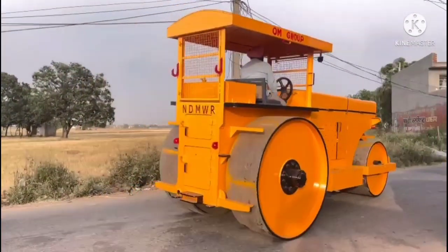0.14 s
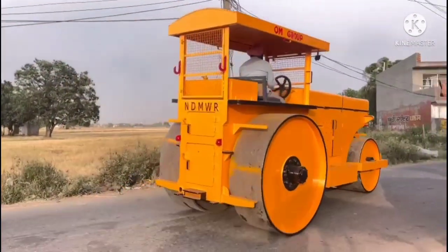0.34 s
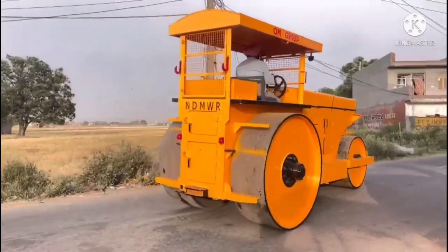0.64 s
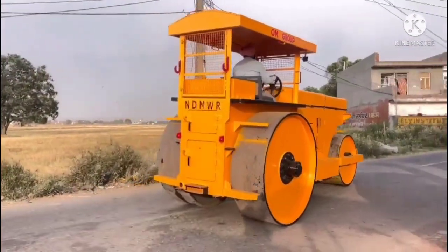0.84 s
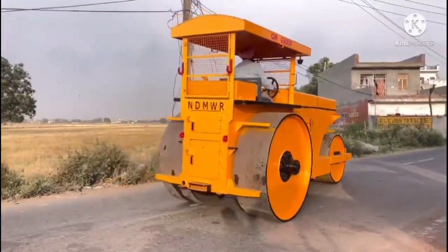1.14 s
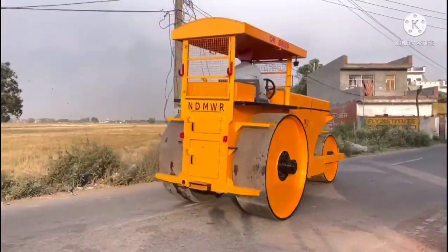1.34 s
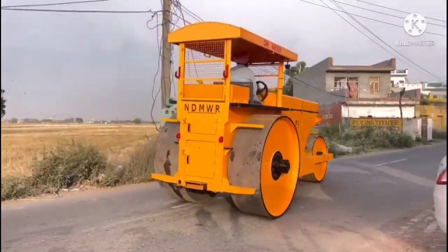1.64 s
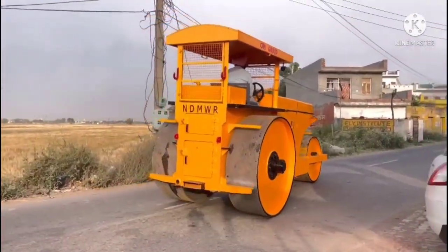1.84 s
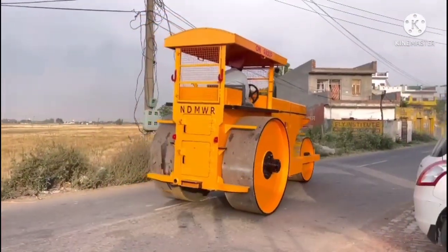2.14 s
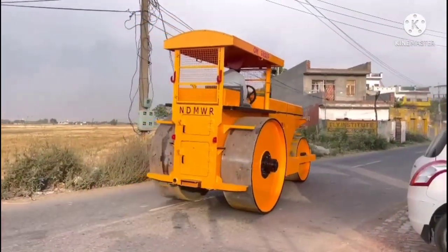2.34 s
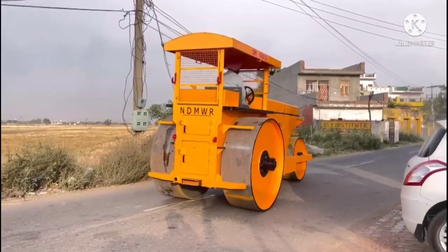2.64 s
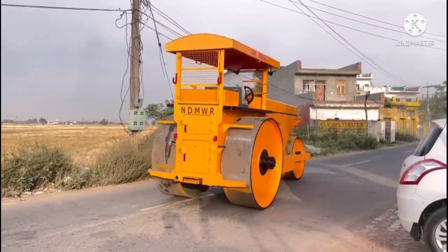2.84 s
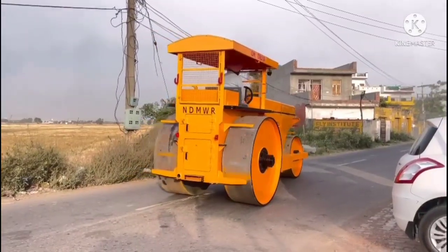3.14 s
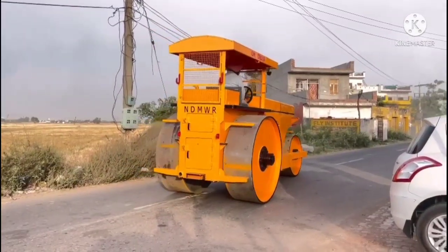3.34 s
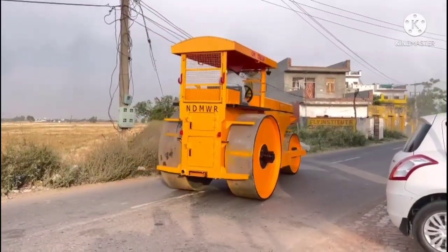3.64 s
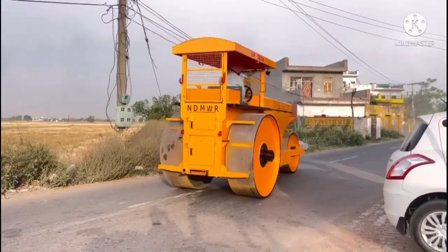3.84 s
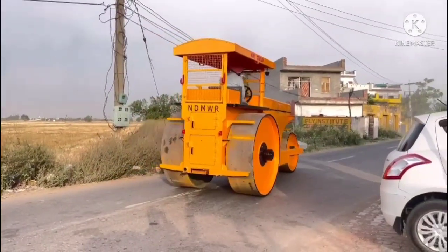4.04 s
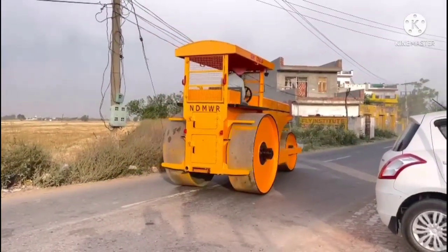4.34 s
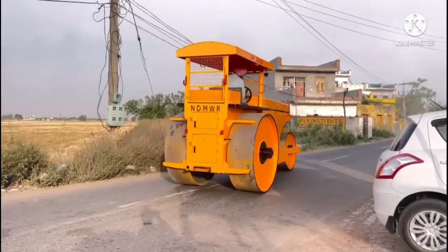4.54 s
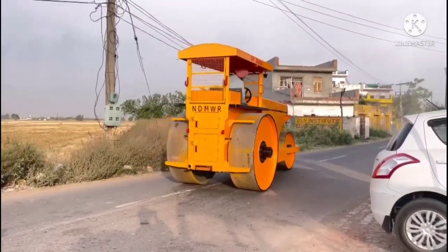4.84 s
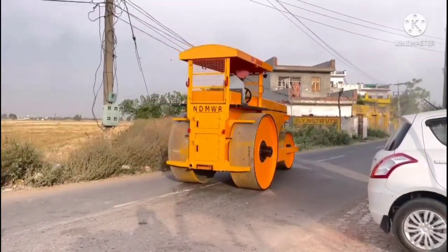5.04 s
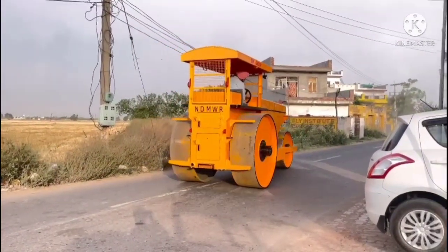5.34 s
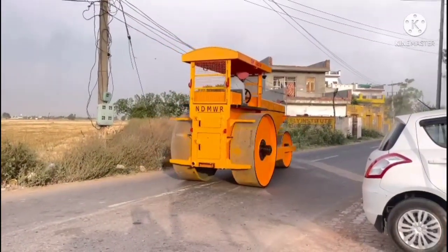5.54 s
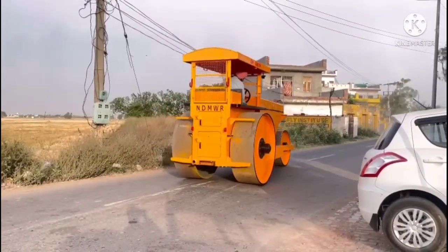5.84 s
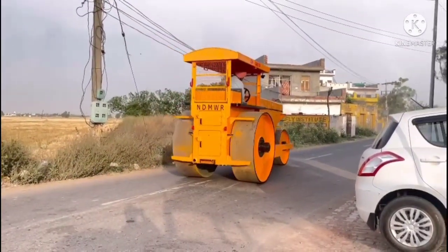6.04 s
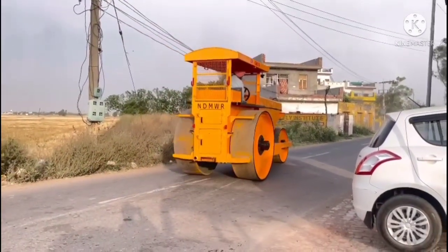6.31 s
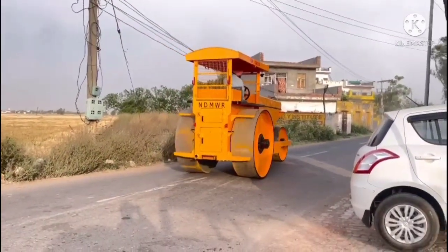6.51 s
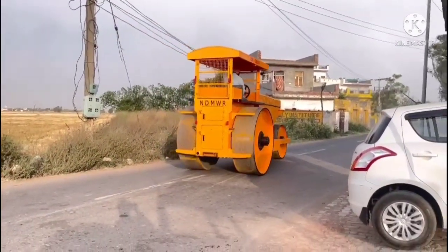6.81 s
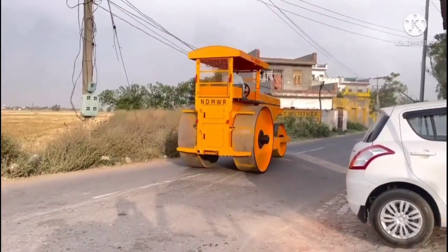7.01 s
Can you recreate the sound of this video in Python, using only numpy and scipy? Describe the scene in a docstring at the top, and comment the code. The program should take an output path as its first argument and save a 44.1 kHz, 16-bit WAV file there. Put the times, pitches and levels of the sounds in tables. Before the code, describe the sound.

Boomy wind flutters and thumps against a handheld microphone beside a road, partly covering a slow six-cylinder diesel roller. The engine runs evenly with metallic clatter, rattling covers, hiss and wavering whine, growing a little fainter as it moves off. Two faint dry rasps pass early. A calm lets the machine come through, a short burst of rough gusts follows, and the engine alone remains.

```python
"""A road roller drives slowly away: its six-cylinder diesel knocks, clatters, hisses, whines and hums throughout.
From the start wind rumbles and flutters over the engine, with surges, slaps and puffs of filtered noise.
Two dry rasps pass early on, at about 0.3 and 1.6 s. Near 4.5 s the wind drops.
A sharp gust returns at about 5.8 s, then the wind dies away and leaves the engine.
Noise through resonances makes the machine, sines its tones; overloaded noise and swings make the wind."""
import sys
import numpy as np
from scipy import signal
from scipy.fft import rfft, irfft
from scipy.io import wavfile
from scipy.ndimage import uniform_filter1d

SR = 44100
rng = np.random.default_rng(int(sys.argv[2]) if len(sys.argv) > 2 else 0)


def persist_wave(psi):
    """Save psi, clipped to +-1, as 16-bit WAV."""
    counts = np.round(np.clip(psi, -1, 1) * 32767).astype(np.int16)
    wavfile.write(sys.argv[1], SR, np.atleast_2d(counts).T)


N = 316197
TIME = np.arange(N) / SR
FREQS = np.fft.rfftfreq(N, 1 / SR)

# engine speed, hunting slightly under the governor: time_s, speed_rpm
ENGINE_SPEED = [(0, 993), (.5, 984), (.8, 996), (1.1, 1003), (1.45, 994), (1.75, 1001), (2, 1010),
                (2.6, 999), (3, 1007), (3.3, 1006), (3.55, 1012), (3.95, 1018), (4.25, 1009), (4.5, 1013),
                (4.8, 1008), (5.15, 1016), (5.55, 1006), (5.9, 1010), (6.45, 1012), (6.75, 1005),
                (7.17, 1010)]
# blows within one cycle of two revolutions: place_in_cycle (0-1), ring_hz, ring_width_hz,
# level_db (against the other blows), rattle_decay_s
KNOCKS = [(.33, 1013, 110, -16, 0.0032), (.46, 964, 89, -16, 0.0086), (.62, 1008, 86, -10, 0.0092),
          (.8, 1016, 68, -13, 0.003), (.09, 814, 98, -12.5, 0.0052), (0, 1410, 420, -11, 0.018),
          (.61, 2120, 970, -16, 0.005), (.19, 6200, 2200, -17.5, 0.018), (.25, 3840, 610, -21.5, 0.0074),
          (.26, 9800, 2800, -23, 0.025)]
# colour of the steady clatter of gears, fan and rolls: frequency_hz, relative_density_db
CLATTER_COLOUR = [(25, -15), (54, 10), (100, 4.5), (200, -3), (380, -3), (560, -4.5), (780, 1), (1040, -4),
                  (1095, -4), (1250, -4.5), (1550, -8), (1900, -13), (2400, -19), (5000, -52)]
# panels and castings that ring under the shaking: ring_hz, width_hz, lift_db
PANELS = [(260, 20, 7.5), (370, 12, 6), (402, 4.6, 5), (480, 37, 6), (655, 27, 5), (720, 28, 3.5),
          (847, 15, 4), (947, 46, 3.5), (1017, 46, 4), (1050, 27, 4), (1347, 63, 3.5), (1499, 24, 7),
          (1610, 57, 5), (2028, 54, 4.5), (2520, 190, 0), (3180, 120, 0.5), (4180, 180, 1.5)]
# level of the engine's body, which fades unevenly: time_s, level_db
BODY_LEVEL = [(0, -32.5), (.4, -33.5), (1.3, -35), (2.45, -36), (3.1, -35.5), (4, -35.5), (5.3, -36),
              (6.3, -36), (6.6, -37)]
# colour of the injector and fan hiss: frequency_hz, relative_density_db
HISS_COLOUR = [(1400, -24), (1900, 0.5), (2600, 3), (2900, 1.5), (3300, 1.5), (4300, -0.7), (4900, -2),
               (6300, -3), (7000, -8), (9400, -11), (11500, -14.5)]
# brief swells of the hiss: middle_s, lift_db, half_length_s
HISS_SWELLS = [(0.332, 2.5, .06), (2.12, 1.5, 0.074), (3.17, 1, 0.11)]
# loose covers that rattle: centre_hz, width_hz, level_db (at the starting distance)
COVERS = [(1660, 140, -47.5), (2567, 200, -46), (3470, 350, -51.5)]
# steady gear tones: multiple_of_cycle_rate (rounded when played), level_db (at the starting distance)
WHINE_TONES = [(98.2, -53), (96.5, -48), (115, -49.5), (117.7, -48.5), (120.4, -41.5), (122, -47),
               (122.2, -44.5), (125.7, -45.5), (162.7, -57), (180.1, -50), (194.5, -54)]
# gear tones that sing out for a while: middle_s, multiple_of_cycle_rate (rounded when played),
# level_db, half_length_s
WHINE_STRANDS = [(0.38, 123, -31.5, 0.3), (.17, 118, -35, .12), (.9, 117, -37, 0.24), (1.15, 127, -40, 0.4),
                 (2.2, 121, -43, .4), (2.6, 114, -42, .45), (2.9, 115, -40, 0.5), (2.9, 120, -42, .4),
                 (3.12, 117, -35.5, 0.34), (3.27, 123, -36, 0.28), (3.74, 118, -45, .3),
                 (4.4, 100, -38, 0.92), (3.9, 96, -39, .5), (5.15, 97, -37, .25), (5.53, 120, -34.5, 0.43),
                 (6.1, 126, -41, .4), (5.8, 123, -39, 0.32), (5, 178, -46, 1.2), (7.1, 114, -40, 0.33)]
# exhaust tones: multiple_of_cycle_rate, level_db (before wavering)
EXHAUST_TONES = [(6, -42), (7, -38), (12, -48), (18, -42.5), (24, -52), (30, -43.5)]
# how alike left and right are: frequency_hz, coherence (0-1)
STEREO_LIKENESS = [(60, 0.66), (500, 0.74), (1000, 0.77), (1400, 0.44), (2000, 0.16), (2700, 0.52),
                   (3750, 1), (4300, 1), (5100, 0.49), (6100, 0.93), (6900, 0.99), (7500, 1)]
# phase between left and right: frequency_hz, phase_turn_rad
STEREO_PHASE = [(6200, 0), (7400, 2.4), (7600, np.pi), (8900, np.pi), (10000, 5.1), (10600, 2 * np.pi)]
# level between left and right: frequency_hz, left_minus_right_db
STEREO_BALANCE = [(350, 0.3), (1000, 1.8), (1400, 3), (2700, 2.5), (3700, -0.3), (5200, 2), (6200, 0.5),
                  (7500, 0)]

# Wind levels below come before the trims and the soft overload.
# breeze, lull, gust and calm: time_s, rumble_level_db, flutter_level_db
WIND_LEVEL = [(0, -19.5, -23), (.6, -21.5, -22.5), (.82, -24.5, -23), (1.1, -21, -22), (2.55, -21.5, -22.5),
              (2.8, -21.5, -23), (3.4, -20.5, -23), (4.1, -22, -24.5), (4.45, -25.5, -23.5),
              (4.58, -41, -29), (5.25, -37, -26), (5.7, -33, -24.5), (5.92, -26.5, -22),
              (6.14, -26.5, -24.5), (6.38, -23, -20.5), (6.46, -28.5, -34.5), (6.75, -33.5, -41),
              (7.17, -36, -37)]
# colour of the deep wind rumble: frequency_hz, relative_density_db
RUMBLE_COLOUR = [(15, -40.5), (30, -17), (43, -5), (60, -1), (80, -3), (105, -4), (140, -7.5), (220, -18.5),
                 (500, -50), (1500, -95)]
# colour of the wind flutter above it: frequency_hz, relative_density_db
FLUTTER_COLOUR = [(50, -31), (110, -4.5), (175, -1.5), (265, -4), (380, -9.5), (550, -16), (900, -27.5),
                  (2000, -42), (6000, -91)]
# brief dips and small lifts of the wind: middle_s, change_db, half_length_s
WIND_DIPS = [(.47, 1, 0.019), (.79, -1, .025), (1.04, 0.5, .02), (1.36, -3, .02), (1.86, -1, 0.014),
             (2.335, -4.5, 0.014), (2.465, -2.5, .02), (2.79, -5, 0.017), (3.55, -2, .018),
             (3.82, 2, 0.018), (3.97, -4, 0.014), (4.37, -3, .018)]
# round, low surges of air: middle_s, peak_db (before lean), pitch_hz, half_length_s
SURGES = [(0.009, -9, 93, 0.017), (.127, -12, 89, 0.01), (.238, -11, 93, .013), (.545, -10, 78, 0.012),
          (0.62, -12, 58, 0.019), (1.19, -5, 58, 0.029), (1.235, -13, 135, 0.028), (1.555, -13, 80, .012),
          (1.689, -14.5, 69, .018), (1.798, -13, 63, 0.016), (2.06, -14.5, 212, 0.013),
          (2.088, -12.5, 55, 0.017), (2.259, -14, 201, 0.016), (2.426, -14.5, 176, .02),
          (3.209, -11.5, 178, 0.0062), (3.51, -11.5, 80, .012), (3.696, -14, 88, 0.017),
          (3.791, -9, 78, 0.011), (3.882, -7.5, 68, 0.024), (4.04, -9.5, 76, 0.014),
          (4.226, -16.5, 75, 0.02), (4.338, -16.5, 179, 0.027), (4.413, -15.5, 290.5, .014),
          (4.423, -13, 165, .014), (5.803, -14, 96, 0.016), (5.869, -14, 170, 0.01),
          (5.965, -12.5, 240, 0.0086), (6, -11.5, 87, .016), (6.243, -9.5, 72, .026),
          (6.352, -14, 75, .012), (6.572, -22, 80, .025)]
# dry rasps in the upper middle range: middle_s, level_db, half_length_s
RASPS = [(.33, -36, 0.062), (1.556, -32.5, 0.058)]
# colour of the rasps: frequency_hz, relative_density_db
RASP_COLOUR = [(700, -30), (1200, 1), (1600, 0), (2000, -6), (2700, -12), (5000, -35)]
# single eddies that hit the microphone: start_s, level_db, push_length_s, upper_edge_hz
EDDIES = [(.37, -15.5, 0.037, 160), (1.164, -17, 0.042, 328), (1.761, -16, 0.029, 300),
          (2.236, -19.5, .06, 233), (2.497, -14.5, 0.037, 540), (2.545, -16, 0.026, 447),
          (3.376, -15, 0.048, 260), (3.856, -12.5, 0.019, 470), (3.992, -13, 0.054, 278),
          (4.395, -12, 0.052, 466), (5.796, -17, 0.02, 280), (5.83, -12, .015, 600),
          (5.848, -12, 0.035, 500), (5.903, -12.5, .025, 560), (5.934, -16, 0.028, 560),
          (5.958, -14, 0.026, 600), (5.983, -14, 0.046, 500), (6.062, -15.5, 0.052, 616),
          (6.111, -14.5, 0.028, 660), (6.217, -12.5, 0.026, 620), (6.242, -9.5, 0.028, 750),
          (6.285, -13, 0.045, 590), (6.355, -13, 0.051, 527)]
# hard single swings of pressure: start_s, peak_db (before lean and filter), pitch_hz
SLAPS = [(.394, -5.5, 101), (.698, -6.5, 85), (0.981, -6, 90), (1.08, -10, 100), (1.314, -6, 130),
         (1.624, -7, 121), (1.956, -14, 120), (2.289, -3.5, 135), (2.365, -7.5, 111), (2.505, -9, 240),
         (2.552, -6.5, 185), (2.66, -9, 120), (2.7, -8.5, 115), (3.336, -13, 110), (3.4, -4, 94),
         (3.859, -3.5, 191), (3.905, -4, 132), (4.006, -4.5, 165), (5.803, -6.5, 170), (5.86, -6, 300),
         (5.905, -6, 330), (6.203, -9, 250), (6.255, -9, 230), (6.287, -7, 380)]
# moments when the low mids sink: middle_s, dip_db (at the band's centre), half_length_s
HOLLOWS = [(2.74, -4.5, 0.17), (6.56, -5, 0.079), (6.85, -3.5, 0.16)]


def gain_of(db):
    """Turns decibels into amplitude."""
    return 10 ** (np.asarray(db) / 20)


def evened(x):
    """Scales a signal to an rms of one."""
    return x / np.sqrt(np.mean(x ** 2) + 1e-20)


def curve(rows, column):
    """Draws one column of a table as a curve in time."""
    rows = np.asarray(rows)
    return np.interp(TIME, rows[:, 0], rows[:, column])


def read(points):
    """Reads a table over frequency, joined on a log axis."""
    hz, value = np.transpose(points)
    return np.interp(np.log(FREQS + 1), np.log(hz + 1), value)


def coloured(x, spectrum):
    """Gives a signal the colour of a table, at an rms of one."""
    return evened(irfft(rfft(x) * gain_of(read(spectrum)), N))


def noise(spectrum):
    """Makes two unrelated noises of the given colour."""
    return coloured(rng.standard_normal((2, N)), spectrum)


def drift(top_hz):
    """Wanders slowly and at random, mostly below top_hz, with an rms of one."""
    lowpass = 1 + (FREQS / top_hz) ** 4
    return evened(irfft(rfft(rng.standard_normal(N)) / lowpass, N))


def bump(middle_s, half_s):
    """Rises and falls smoothly around one moment."""
    return np.exp(-((TIME - middle_s) / half_s) ** 2)


def swelling(rows):
    """Gain over a set of brief swells or dips."""
    return gain_of(sum(db * bump(middle_s, half_s) for middle_s, db, half_s in rows))


def add(mix, start_s, sound):
    """Lays a sound into the mix at start_s."""
    part = mix[:, max(round(start_s * SR), 0):][:, :sound.shape[1]]
    part += sound[:, :part.shape[1]]


def pair(two, likeness):
    """Blends two unrelated signals into a left and a right of the given likeness."""
    common = two[0] * np.sqrt((1 + likeness) / 2)
    apart = two[1] * np.sqrt((1 - likeness) / 2)
    return np.array([common + apart, common - apart])


def stereo(two):
    """Gives a sound its stereo width, level lean and treble phase turn."""
    lean = gain_of(read(STEREO_BALANCE) / 2)
    left, right = pair(rfft(two), read(STEREO_LIKENESS))
    turned = right / lean * np.exp(-1j * read(STEREO_PHASE))
    return irfft(np.array([left * lean, turned]), N)


def receding(start_db, loss_db):
    """Gain of a sound moving steadily away, losing loss_db for each tenfold distance."""
    start_m, away_m_per_s = 6.14, 0.74
    distance_m = start_m + away_m_per_s * TIME
    return gain_of(start_db - loss_db * np.log10(distance_m / start_m))


def knocks(cycles, uneven_db=2.0, jitter_s=.0001, repeat=0.41):
    """Each blow is a short rattle, partly the same in every cycle, that rings one part of the block."""
    out = np.zeros((2, N))
    age = np.arange(2048) / SR
    for place, hz, width_hz, db, decay_s in KNOCKS:
        late, size = rng.standard_normal((2, 64))  # one value for each engine cycle
        blows = np.arange(len(late)) + place
        when = np.interp(blows, cycles, TIME, right=np.inf) + jitter_s * late
        same = rng.standard_normal((2, len(age)))
        fresh = rng.standard_normal((len(late), 2, len(age)))
        rattles = np.sqrt(repeat) * same + np.sqrt(1 - repeat) * fresh
        rattles *= np.exp(-age / decay_s)
        band = signal.butter(2, [hz - width_hz / 2, hz + width_hz / 2], "band", fs=SR, output="sos")
        rings = signal.sosfilt(band, rattles)
        rings /= np.linalg.norm(rings, axis=-1, keepdims=True)
        rings *= gain_of(uneven_db * size)[:, None, None]
        track = np.zeros((2, N))
        for start_s, ring in zip(when[when < TIME[-1]], rings):
            add(track, start_s, ring)
        out += gain_of(db) * evened(track)
    return out


def clatter(cycles, repeat=0.25):
    """The same teeth and tappets meet in every cycle, so part of the clatter noise repeats."""
    places = np.linspace(0, 1, 5200, endpoint=False)
    patterns = rng.standard_normal((2, len(places)))
    again = evened(np.array([np.interp(cycles % 1, places, one) for one in patterns]))
    fresh = rng.standard_normal((2, N))
    return coloured(np.sqrt(repeat) * again + np.sqrt(1 - repeat) * fresh, CLATTER_COLOUR)


def panels(x):
    """Each panel resonance lifts a narrow band and lets it ring on."""
    lift = 1 + sum((gain_of(db) - 1) / (1 + 2j * (FREQS - hz) / width_hz) for hz, width_hz, db in PANELS)
    return irfft(rfft(x) * lift, N)


def body(cycles, clatter_db=6.5, flicker_db=0.5):
    """Knocks and flickering clatter shake the engine's body together."""
    flicker = gain_of(clatter_db + flicker_db * drift(top_hz=45))
    shaking = knocks(cycles) + clatter(cycles) * flicker
    return gain_of(curve(BODY_LEVEL, column=1)) * shaking


def hiss(shimmer_db=0.5):
    """Injectors and fan hiss as shimmering coloured noise that recedes and briefly swells."""
    shimmer = gain_of(shimmer_db * drift(top_hz=17))
    return receding(start_db=-34, loss_db=16.5) * swelling(HISS_SWELLS) * shimmer * noise(HISS_COLOUR)


def covers(cycles, rough_db=5.5, rough_hz=40, loss_db=12):
    """Thin covers chatter in fits, each in its own narrow band and hardest once in a cycle."""
    out = np.zeros((2, N))
    for hz, width_hz, db in COVERS:
        uneven = np.tanh(drift(top_hz=rough_hz))
        pulse = np.cos(2 * np.pi * (cycles + rng.random()))
        fits = gain_of(rough_db * (uneven + pulse))
        shaken = rfft(fits * rng.standard_normal((2, N)))
        ring = irfft(shaken / (1 + 1j * (FREQS - hz) / width_hz) ** 2, N)
        out += gain_of(db) * evened(ring)
    return receding(0, loss_db) * out


def whine(cycles, fade_db=2, wobble_rad=0.37, loss_db=10, pulse_db=2.0, left_db=2):
    """Thin gear tones locked to the crankshaft pulse once a cycle; steady ones waver, others sing out."""
    def tone(order):
        turns = round(order) * cycles + rng.random()
        return np.sin(2 * np.pi * turns + wobble_rad * drift(top_hz=14))

    steady = sum(gain_of(db) * evened(gain_of(fade_db * drift(top_hz=1.6))) * tone(order)
                 for order, db in WHINE_TONES)
    singing = sum(gain_of(db) * bump(middle_s, half_s) * tone(order)
                  for middle_s, order, db, half_s in WHINE_STRANDS)
    pulsing = evened(gain_of(pulse_db * np.cos(2 * np.pi * (cycles - .7))))
    sides = gain_of([[left_db / 2], [-left_db / 2]])
    return sides * pulsing * (receding(0, loss_db) * steady + singing)


def exhaust(cycles, waver_db=5.0):
    """The exhaust hums on multiples of the cycle rate, each wavering in the moving air."""
    return sum(gain_of(db + waver_db * drift(top_hz=3.9))
               * np.sin(2 * np.pi * (round(order) * cycles + rng.random())) for order, db in EXHAUST_TONES)


def engine():
    """One crankshaft drives knocks, clatter, covers, whine and exhaust, under a free-running hiss."""
    cycles = np.cumsum(curve(ENGINE_SPEED, column=1)) / (2 * 60 * SR)  # two revolutions a cycle
    machine = stereo(panels(body(cycles) + hiss()) + covers(cycles))
    return machine + exhaust(cycles) + whine(cycles)


def turbulence(spectrum, steadiness):
    """Coloured noise with its slow swells partly evened out, so that the airflow sets its strength."""
    air = noise(spectrum)
    swell = np.sqrt(abs(uniform_filter1d(air ** 2, size=2600)) + 1e-9)  # level over about 59 ms
    return evened(air / swell ** steadiness)


def wind(rumble_db=0.7, flutter_db=-0.5, surge_db=2.5, lumpy_db=1.6, buffet_db=1.12, likeness=0.82):
    """Air tumbling past the microphone: a surging rumble under a lumpy flutter, buffeted together."""
    buffets = evened(gain_of(buffet_db * drift(top_hz=8)))
    swells = evened(gain_of(surge_db * drift(top_hz=13)))
    lumps = evened(gain_of(lumpy_db * drift(top_hz=35)))
    rumble_gain = gain_of(curve(WIND_LEVEL, column=1) + rumble_db)
    rumble = rumble_gain * turbulence(RUMBLE_COLOUR, steadiness=0.49) * swells
    flutter_gain = gain_of(curve(WIND_LEVEL, column=2) + flutter_db)
    flutter = flutter_gain * turbulence(FLUTTER_COLOUR, steadiness=0.61) * lumps
    return buffets * swelling(WIND_DIPS) * (pair(rumble, likeness) + pair(flutter, likeness))


def surges(lean_db=0.5):
    """Each surge swings the pressure as a sine that swells and ebbs smoothly."""
    out = np.zeros((2, N))
    chances = rng.uniform(-0.99, 1, (len(SURGES), 2))
    for (middle_s, db, hz, half_s), (turn, lean) in zip(SURGES, chances):
        swing = bump(middle_s, half_s) * np.sin(2 * np.pi * (hz * TIME + turn))
        out += gain_of([[db + lean_db * lean], [db - lean_db * lean]]) * swing
    return out


def rasps():
    """A dry rasp of coloured noise comes and goes twice."""
    level = sum(gain_of(db) * bump(middle_s, half_s) for middle_s, db, half_s in RASPS)
    return stereo(noise(RASP_COLOUR)) * level


def eddies(low_hz=42, likeness=0.76, skew=0.68):
    """Each eddy is a puff of band-limited noise that strikes fast and ebbs more slowly."""
    out = np.zeros((2, N))
    for start_s, db, length_s, top_hz in EDDIES:
        window = np.sin(np.pi * np.linspace(0, 1, round(length_s * SR)) ** skew)
        size = 2 * len(window)  # silence after the push leaves room for the filter to ring
        push = np.pad(window, (0, len(window))) * rng.standard_normal((2, size))
        band = signal.butter(3, [low_hz, top_hz], "band", fs=SR, output="sos")
        puff = signal.sosfilt(band, push) * np.hanning(2 * size)[size:]
        puff *= np.linalg.norm(window) / np.linalg.norm(puff, axis=1, keepdims=True)
        add(out, start_s, gain_of(db) * puff)
    return pair(out, likeness)


def slaps(ring_cycles=0.8, lean_db=3.0, dull_hz=700):
    """Each slap is a quickly damped sine, a little harder on one side."""
    out, age = np.zeros((2, N)), np.arange(3000) / SR
    leans = lean_db * rng.standard_normal(len(SLAPS))
    for (start_s, db, hz), lean in zip(SLAPS, leans):
        swing = np.sin(2 * np.pi * hz * age) * np.exp(-hz * age / ring_cycles)
        add(out, start_s, gain_of([[db + lean / 2], [db - lean / 2]]) * swing / swing.max())
    band = signal.butter(2, [36, dull_hz], "band", fs=SR, output="sos")
    return signal.sosfilt(band, out)


def hollowed(x, centre_hz=400, width_octaves=0.75):
    """Thins the low mids of the whole mix during each hollow."""
    band = np.exp(-(np.log2((FREQS + 1) / centre_hz) / width_octaves) ** 2)
    return x + (swelling(HOLLOWS) - 1) * irfft(rfft(x) * band, N)


def scene(dull_hz=1050):
    """The roller under the wind, whose gusts overload softly and stay dull."""
    gusts = wind() + gain_of(-0.5) * surges() + gain_of(-0.93) * eddies() + gain_of(-0.5) * slaps()
    overloaded = 0.92 * np.tanh(gusts / 0.85)
    dull = signal.butter(4, dull_hz, fs=SR, output="sos")
    return hollowed(engine() + rasps() + signal.sosfilt(dull, overloaded))


def record(dry):
    """The recorder's band limit: a steep low-pass filter."""
    edge = signal.firwin(511, 11700, window=("kaiser", 9), fs=SR)  # edge in Hz
    return signal.oaconvolve(dry, edge[None], "same", axes=1)


dry = scene()
out = record(dry)
persist_wave(out)
```